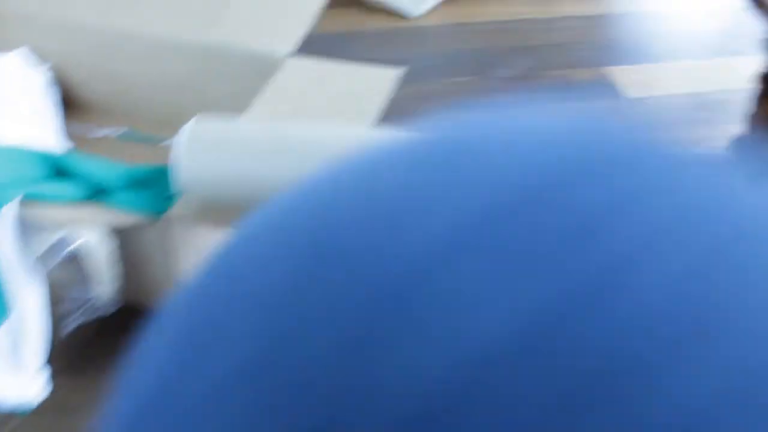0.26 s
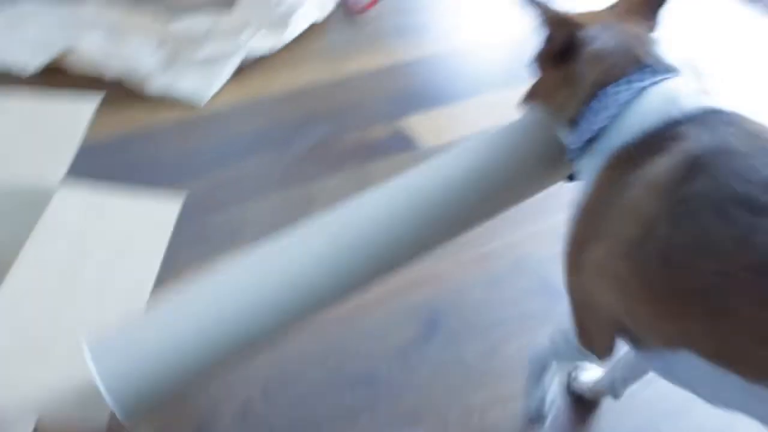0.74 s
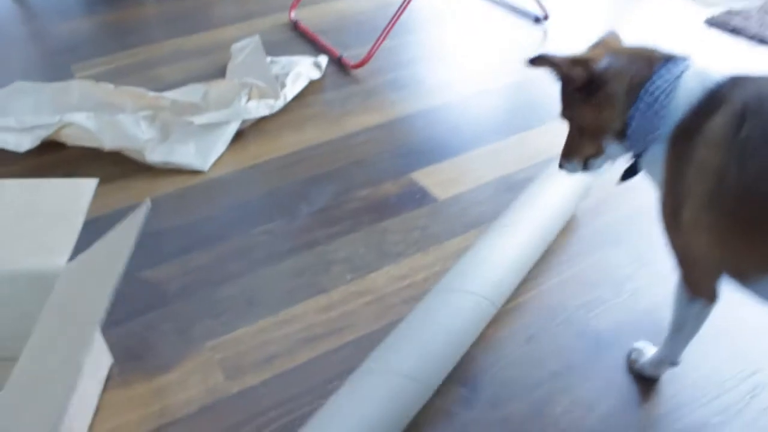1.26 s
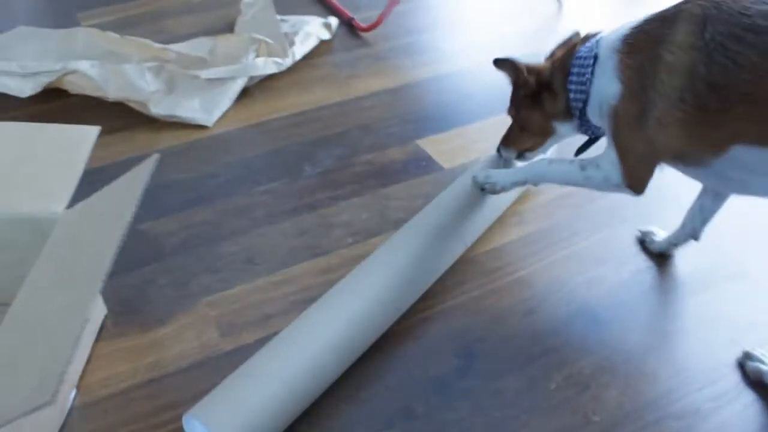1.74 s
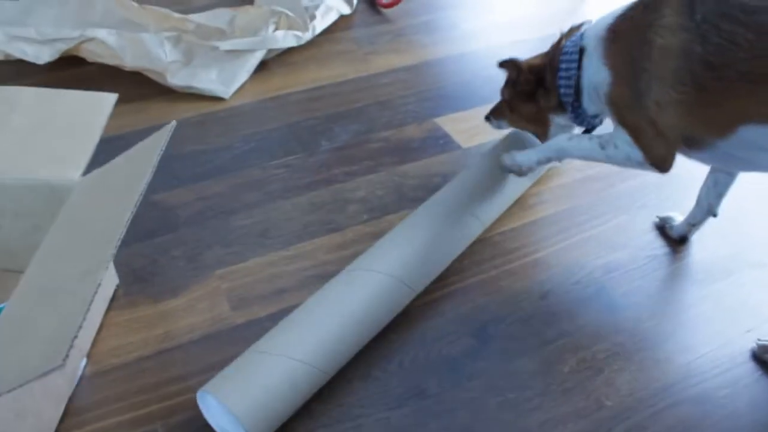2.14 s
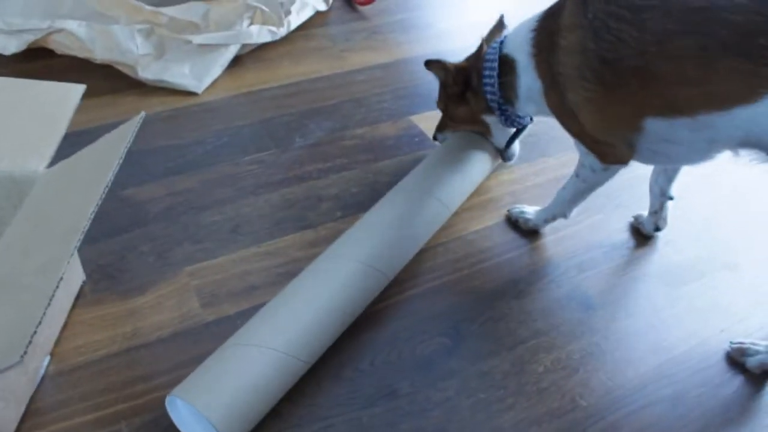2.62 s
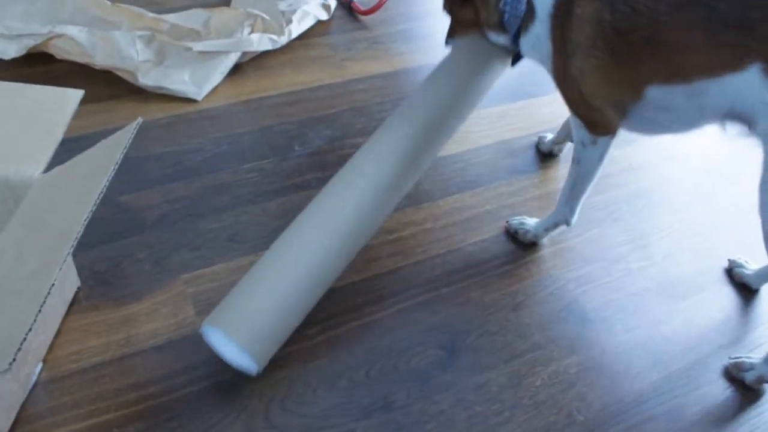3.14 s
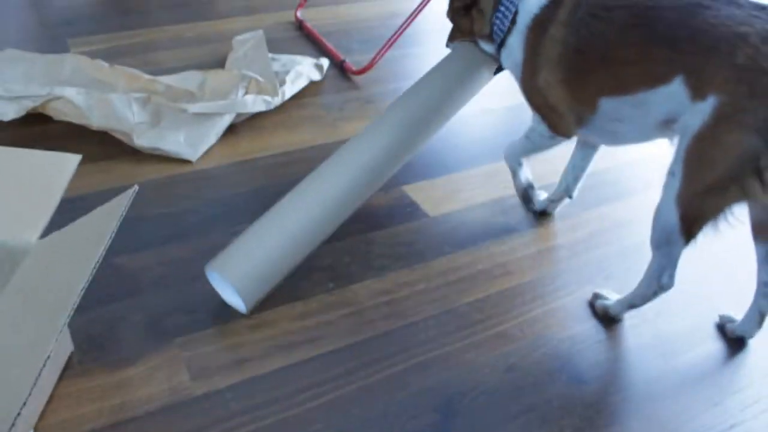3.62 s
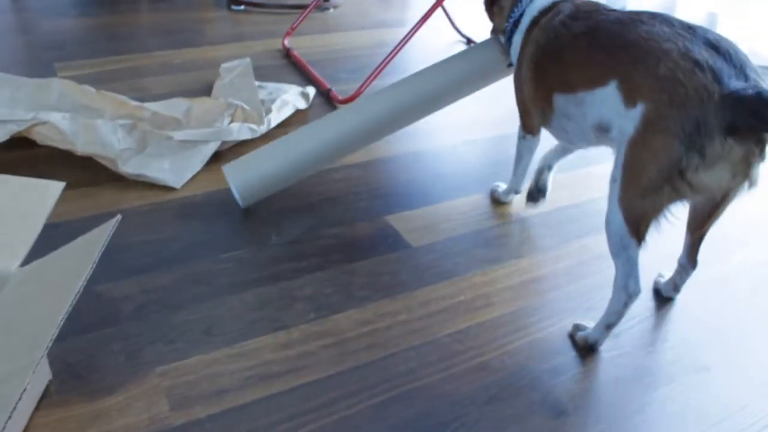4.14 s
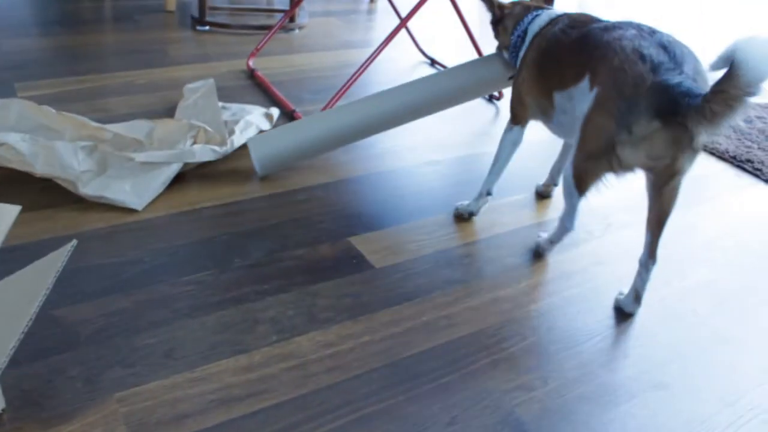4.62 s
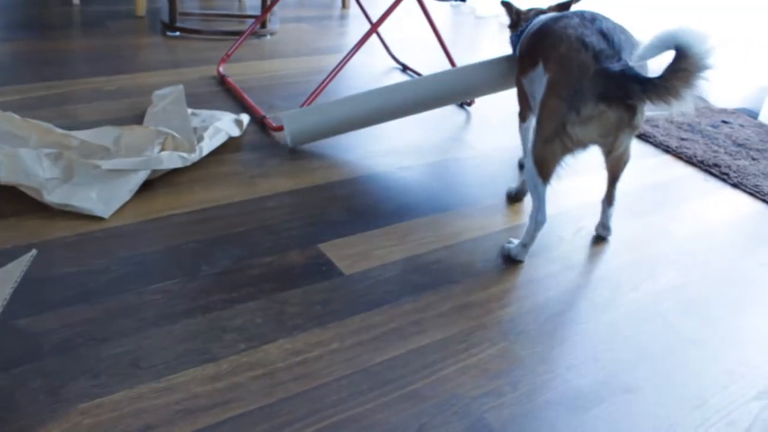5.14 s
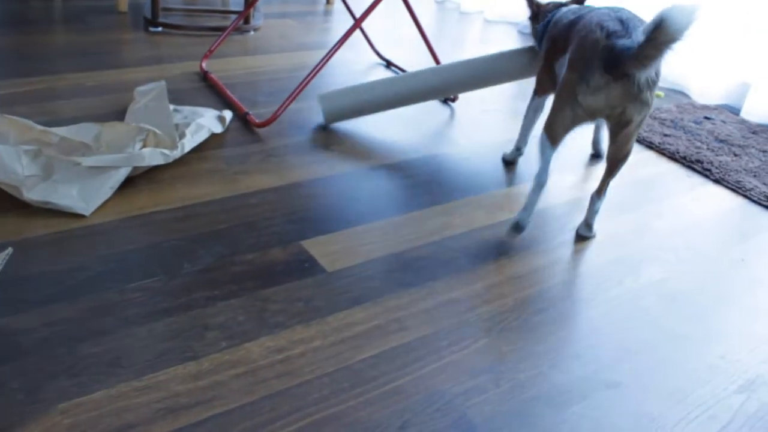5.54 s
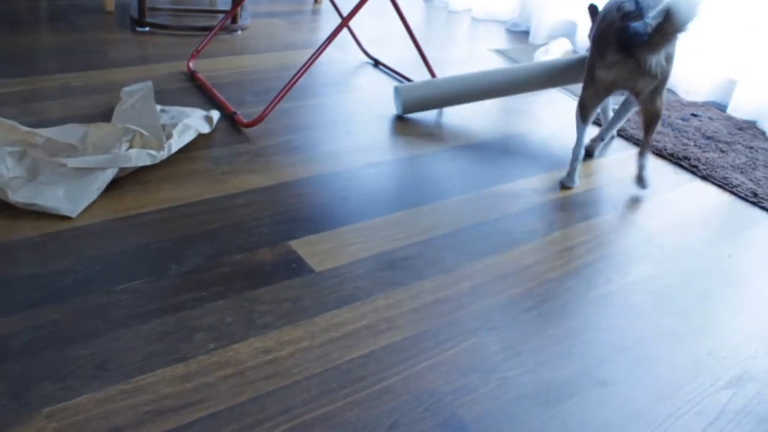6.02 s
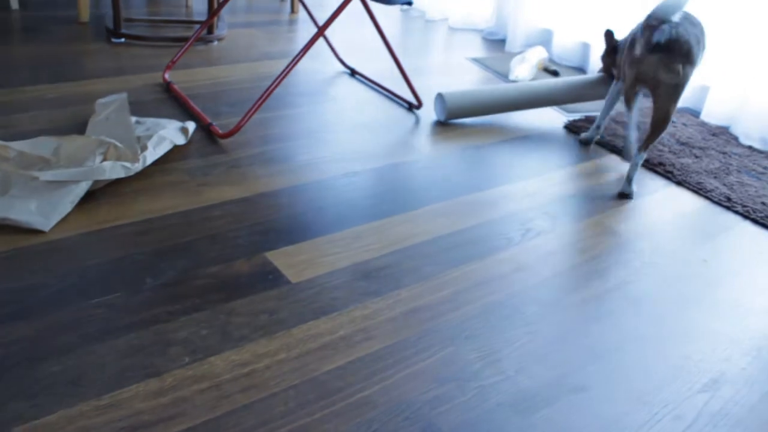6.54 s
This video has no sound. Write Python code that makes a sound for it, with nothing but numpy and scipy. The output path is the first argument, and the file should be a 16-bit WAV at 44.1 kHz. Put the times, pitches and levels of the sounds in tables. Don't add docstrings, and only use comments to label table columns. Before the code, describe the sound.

A dog wrestles a long cardboard tube indoors. Quick scraping and claw clicks lead to sharp, overloaded knocks, followed by a quieter spell of small ticks, scuffs and soft steps. Dry cardboard then slides over floorboards with rumble and dusty hiss, struck by two heavy thuds and a smaller tumbling clatter. Short room echo grows as the action moves away from the slightly dull camera microphone.

```python
import sys
import numpy as np
from scipy import signal
from scipy.fft import rfft, irfft
from scipy.io import wavfile
from scipy.ndimage import uniform_filter1d

SR = 44100
rng = np.random.default_rng(int(sys.argv[2]) if len(sys.argv) > 2 else 0)


def store_wav(level_fs):
    pcm = np.round(np.clip(np.atleast_2d(level_fs), -1, 1) * 32767)
    wavfile.write(sys.argv[1], SR, pcm.T.astype(np.int16))


def linear_from_db(decibels):
    return 10 ** (np.asarray(decibels, float) / 20)


N = 298557


def evened(x):
    return x / np.sqrt(np.mean(x ** 2) + 1e-20)


def read(points, hz):
    point_hz, value = np.transpose(points)
    return np.interp(np.log(hz + 1), np.log(point_hz + 1), value)


def add(mix, start_s, sound):
    part = mix[round(start_s * SR):][:len(sound)]
    part += sound[:len(part)]


def resonate(x, hz, width_hz):
    b, a = signal.iirpeak(min(hz, SR / 2.2), max(hz / width_hz, .3), SR)
    return signal.lfilter(b, a, x)


def resonate_twice(x, hz, width_hz):
    return resonate(resonate(x, hz, width_hz), hz, width_hz)


def highpass(x, order, hz):
    return signal.lfilter(*signal.butter(order, hz, "high", fs=SR), x)


def body(x, modes, wander_db):
    drift = rng.standard_normal((len(modes), len(x) // 400 + 2))
    drift = uniform_filter1d(uniform_filter1d(drift, size=9, axis=1), size=9, axis=1)
    drift = np.repeat(evened(drift), 400, axis=1)[:, :len(x)]
    out = np.zeros(len(x))
    for k, (hz, width_hz, level_db) in enumerate(modes):
        driven = x * linear_from_db(level_db + wander_db * drift[k])
        out += (-1) ** k * resonate_twice(driven, hz, width_hz)
    return evened(out)


def ring(hz, t60_s, size=4000):
    t = np.arange(size) / SR
    return -np.sin(2 * np.pi * hz * t) * linear_from_db(-60 * t / t60_s)


# time_s, level_db
FIZZ = [(0, -7.5), (2.5, -1), (4.5, -11), (5.3, -3.5), (6.5, -33)]


def crack(start_s, t60_s, size=4000):
    grit = rng.standard_normal(size)
    slap = evened(resonate(resonate(grit, 2500, 4200), 2300, 3500))
    fizz = linear_from_db(np.interp(start_s, *np.transpose(FIZZ))) * np.gradient(grit)
    fade = linear_from_db(-60 * np.arange(size) / SR / t60_s)
    return (slap + fizz) / 2.18 * fade


def friction(slips_per_s, spread_db, smooth, flutter_db):
    size_db = spread_db * np.minimum(rng.exponential(1, N), 4)
    slips = (rng.random(N) < slips_per_s / SR) * linear_from_db(size_db)
    rub = evened(slips * rng.standard_normal(N)) + smooth * rng.standard_normal(N)
    flutter = uniform_filter1d(uniform_filter1d(rng.standard_normal(N), size=500), size=500)
    return rub * linear_from_db(flutter_db * evened(flutter))


# freq_hz, density_db_per_hz
QUIET = [(25, -17), (133, -6), (550, -23), (1580, 0), (6650, -20.5), (11000, -18), (12500, -29.5),
         (22000, -120)]


def air():
    spectrum = rfft(rng.standard_normal(N)) * linear_from_db(read(QUIET, np.fft.rfftfreq(N, 1 / SR)))
    return linear_from_db(-70) * evened(irfft(spectrum, N))


# freq_hz, t60_s
ROOM_DECAY = [(100, 0.15), (260, 0.68), (700, 0.33), (1840, 0.32), (4850, 0.26), (7000, 0.39), (12000, 0.1)]
# freq_hz, level_db
ROOM_TONE = [(60, -21), (200, -2.5), (900, 2.5), (3000, 1.5), (5300, 7.5), (6200, -8.5), (12000, 10.5)]


def room(x):
    taps = np.zeros(SR)
    at = np.arange(130, SR - 12, 12)
    taps[at + rng.integers(0, 12, len(at))] = rng.choice([-1., 1.], len(at))
    hz, t, z = signal.stft(taps, SR, nperseg=256)
    decay_db = read(ROOM_TONE, hz)[:, None] - 60 * t / read(ROOM_DECAY, hz)[:, None]
    tail = signal.istft(z * linear_from_db(decay_db), SR, nperseg=256)[1]
    tail *= np.interp(np.arange(len(tail)) / SR, [.003, .004, .025], [0, .45, 1])
    return signal.fftconvolve(x, tail / np.linalg.norm(tail))[:N]


# start_s, peak_db, pitch_hz
PAW_FALLS = [
    (1.654, -51, 394),
    (1.798, -41.5, 340),
    (2.062, -34, 390),
    (2.324, -46, 450),
    (2.626, -61, 326),
    (3.049, -40.5, 194),
    (5.93, -37, 133),
    (6.234, -39, 83.5),
]


def paws():
    out, t = np.zeros(N), np.arange(4000) / SR
    for start_s, peak_db, pitch_hz in PAW_FALLS:
        add(out, start_s, linear_from_db(peak_db) * ring(pitch_hz, 0.052) * (1 - np.exp(-t / 0.0011)))
    return out


# start_s, length_s, level_db, pitch_hz, swell_share of
GROAN_STROKES = [
    (0.021, 0.11, -34.5, 450, 0.68),
    (0.173, 0.22, -33, 438, 0.52),
    (0.323, 0.074, -23.5, 339, 0.66),
    (0.42, 0.023, -47.5, 400, .56),
    (0.507, 0.028, -20, 830, 0.24),
    (1.836, 0.12, -54, 4600, .05),
    (2.073, 0.081, -47, 340, 0.55),
    (3.822, 0.021, -52, 543, .3),
    (6.677, 0.0054, -56, 10600, .2),
    (6.683, .006, -64, 10500, .2),
]
# start_s, length_s, level_db, pitch_hz, swell_share of length
SCUFF_STROKES = [(0.315, 0.065, -26, 2780, 0.96), (0.362, 0.027, -31, 4800, 0.66),
                 (0.571, 0.045, -46, 7000, .5), (1.059, .05, -61, 7960, 0.24),
                 (1.567, 0.044, -54, 5850, .3), (1.696, 0.092, -55, 9000, .3),
                 (1.711, 0.08, -38.5, 2610, 0.73), (2.004, 0.084, -46.5, 1880, 0.51),
                 (2.146, 0.033, -53, 2000, .45), (3.042, 0.041, -44.5, 10100, .1),
                 (3.205, 0.55, -45.5, 2700, 0.33), (4.247, 0.055, -37.5, 11400, 0.082),
                 (4.248, 0.068, -41.5, 2000, .03), (1.504, 0.072, -66, 920, 0.38),
                 (4.789, 0.039, -43, 3630, 0.3), (5.227, 0.012, -16.5, 2970, 0.12),
                 (5.315, 0.012, -38, 6700, .1), (4.046, 0.66, -54, 265, 0.32),
                 (5.544, 0.41, -51.5, 165, 0.97), (5.906, 0.14, -51.5, 1600, 0.49),
                 (6.265, 0.047, -47.5, 1620, .33), (6.473, 0.073, -45.5, 1410, .9),
                 (6.549, 0.12, -43.5, 1970, 0.029)]


def scuffs():
    out = np.zeros(N)
    grit = friction(slips_per_s=2500, spread_db=2.2, smooth=1.6, flutter_db=1.5)
    for strokes, width_share in [(GROAN_STROKES, 0.2), (SCUFF_STROKES, 1.26)]:
        for start_s, length_s, level_db, pitch_hz, swell_share in strokes:
            width_hz = min(width_share * pitch_hz, 5560)
            progress = np.arange(0, 1, 1 / (length_s * SR))
            stroke = np.interp(progress, [0, np.clip(swell_share, .02, .95), 1], [.15, 1, .3])
            rub = grit[round(start_s * SR):][:len(progress)]
            add(out, start_s, linear_from_db(level_db) * stroke * evened(resonate_twice(rub, pitch_hz, width_hz)))
    return out


# start_s, peak_db, pitch_hz, crack_db
CLAW_TICKS = [(0.226, -24, 1695, -12), (0.185, -44, 1090, -3), (0.2451, -18, 2200, 9.5),
              (.272, -17.5, 1800, -16), (.381, -16, 2000, -15), (0.9393, -26.5, 2200, -30),
              (0.985, -28, 1690, -13), (0.887, -24.5, 2500, -17), (1.017, -34.5, 1600, -23.5),
              (1.2833, -38.5, 3060, 0), (1.338, -54, 1600, 7), (1.42, -64.5, 1600, -12.5),
              (1.43, -59, 1812, -7.5), (1.496, -50, 2430, 5), (1.505, -45, 3470, 1),
              (1.6562, -47.5, 910, -4), (1.8352, -32, 1400, 11.5), (1.848, -31, 4720, -4),
              (2.007, -46, 1600, 7.5), (2.337, -37.5, 920, -10), (2.4, -41, 3360, 7.5),
              (2.4066, -33, 3560, -5), (3.07, -40, 810, 11), (3.617, -29, 4800, 0), (3.637, -28, 3400, 1),
              (3.6413, -30, 4630, -6), (3.80, -48, 4840, -7), (4.25, -42.5, 3350, 7)]


def ticks():
    tone, grit = np.zeros((2, N))
    for start_s, peak_db, pitch_hz, crack_db in CLAW_TICKS:
        add(tone, start_s, linear_from_db(peak_db) * ring(pitch_hz, 19 / pitch_hz))
        add(grit, start_s, linear_from_db(peak_db + crack_db) * crack(start_s, 0.018))
    return tone, grit


# freq_hz, width_hz, level_db
WALL_MODES = [(860, 110, 0), (930, 110, -1)]
# freq_hz, width_hz, level_db
BOARD_MODES = [(81, 170, -7), (172, 180, -3.5), (241, 92, -0.5), (327, 110, -6), (450, 150, -8),
               (614.4, 180, -4)]
# start_s, peak_db, contact_hz, hollow_db, crack_db
EDGE_KNOCKS = [(0.4886, 10.5, 745, -1, -18), (0.501, -4.5, 855, -34, -43), (0.7, -5.5, 870, -34, -6.5),
               (.711, 12, 1580, -31, -22), (0.7129, 0.5, 4810, -30, 0.5), (0.7258, -13, 1680, -26, -2),
               (0.8749, -14.5, 1500, -22, -9), (2.069, -28, 998, 7, -8), (3.0464, -23.5, 1080, -20, -0.5),
               (5.228, -12.5, 1240, 11.5, -5), (6.5543, -8.5, 1840, -51, -25.5),
               (6.555, -8.5, 2980, -28, -34)]
# start_s, peak_db, contact_hz, contact_t60_s, crack_db
SIDE_THUDS = [
    (0.8668, -23.5, 858.5, 0.17, -10),
    (4.599, 1.5, 786, 0.0013, -10),
    (5.221, -10, 562, 0.031, -0.5),
    (6.56, -15, 1250, 0.015, -27),
    (6.56, -25, 152, 0.073, -30),
    (6.589, -30, 590, .046, -20),
    (6.607, -31, 884, .069, -24),
]


def knocks():
    contact, tube = np.zeros((2, N))
    blows = []
    for start_s, peak_db, hz, hollow_db, crack_db in EDGE_KNOCKS:
        t60_s = min(.0095, 17 / hz)
        blows.append((start_s, peak_db, hz, t60_s, hollow_db, crack_db))
    for start_s, peak_db, hz, t60_s, crack_db in SIDE_THUDS:
        blows.append((start_s, peak_db, hz, t60_s, 3, crack_db))
    for start_s, peak_db, hz, t60_s, hollow_db, crack_db in sorted(blows):
        hollow = sum(linear_from_db(d) * ring(f * rng.uniform(0.92, 1.074), 5.27 / w) for f, w, d in BOARD_MODES[1:]) / 8
        wall = sum(linear_from_db(d - 20) * ring(f, 3.5 / w) for f, w, d in WALL_MODES)
        add(contact, start_s, linear_from_db(peak_db) * ring(hz, t60_s))
        add(tube, start_s, linear_from_db(peak_db) * (wall + linear_from_db(crack_db) * crack(start_s, 0.039)))
        add(tube, start_s + .0008, -linear_from_db(peak_db + hollow_db) * hollow)
    return contact, highpass(tube, 2, 110)


def rubbing(strokes, rumble_db):
    t, (time_s, pressure_db, speed) = np.arange(N) / SR, np.transpose(strokes)
    db = np.interp(t, time_s, pressure_db, -120, -120)
    fast = np.clip(np.interp(t, time_s, speed), 0, 1)
    wall_db = 1 - 12 * fast
    dust_db = -12 + 9 * fast
    boards_db = rumble_db + 0.53 * (db + 45) + 1.5 * fast
    return linear_from_db([db, db + wall_db, boards_db, db + dust_db])


# start_s, rim_db, wall_db, boards_db
SHUDDER_SWELLS = [(.49, -28.5, -31, -38), (0.699, -25.5, -45, -38.5), (0.866, -38, -35, -38),
                  (1.8, -64, -68.5, -54.5), (2.03, -75, -75, -51), (3.045, -40, -44, -47),
                  (4.6, -30, -57, -36.5), (5.222, -29, -44, -34), (5.93, -51, -46, -46),
                  (6.471, -55, -50, -45.5), (6.58, -46, -58, -34)]


def shudders():
    out, t = np.zeros((4, N)), np.arange(SR) / SR
    rise_s, t60_s = (.03, .01, .017), (.56, .62, .55)
    for start_s, *level_db in SHUDDER_SWELLS:
        for layer in range(3):
            fade = linear_from_db(level_db[layer] - 60 * t / t60_s[layer])
            add(out[layer], start_s, (np.minimum(t / rise_s[layer], 1) * fade) ** 2)
    out[3] = out[0] * linear_from_db(2 * -25.5)
    return out


# time_s, pressure_db, speed 0-1
BOX_PULL = [
    (0.0, -39, 0.44),
    (0.282, -37, 0.94),
    (0.406, -38.5, 0.2),
    (0.486, -49, .2),
]
# time_s, pressure_db, speed 0-1
FLOOR_DRAG = [(1.58, -71.5, .3), (1.82, -53.5, 0.5), (2.09, -73.5, 1), (2.38, -53, 0), (2.68, -50, 0.07),
              (2.92, -45.5, 0), (3.09, -49, 0.18), (3.29, -42.5, 0.46), (3.45, -46.5, 1), (3.88, -49, 0.6),
              (4.11, -50.5, 0.72), (4.29, -45.5, 0.55), (4.87, -51, 0.76), (5.2, -43, 0.94), (5.55, -49, 0),
              (5.9, -53.5, 0.9), (6.3, -49, 0.4), (6.77, -55, 0)]
# freq_hz, width_hz, level_db
RIM_MODES = [(1155, 540, -2.5), (1600, 380, -4.5), (2000, 350, -4), (2200, 120, -1.5), (2500, 390, -0.5),
             (2892, 170, -1), (3096, 96, 1.5), (3325, 200, -4), (3805, 680, -5.5), (4384, 180, -8),
             (4786, 330, -6.5), (5090, 230, -8), (5450, 1400, -12.5)]
# freq_hz, width_hz, level_db
DUST_MODES = [(6180, 800, -9.5), (7100, 5000, -7), (8090, 2200, 3), (9300, 2900, -3), (11120, 1700, 3)]


def drag():
    light = rubbing(BOX_PULL, rumble_db=-43.5) ** 2 + shudders()
    heavy = rubbing(FLOOR_DRAG, rumble_db=-58.5) ** 2
    on_rim, on_wall, _, on_dust = np.sqrt(light + heavy)
    force = friction(slips_per_s=3500, spread_db=2.5, smooth=1.6, flutter_db=0.68)
    fine = friction(slips_per_s=4700, spread_db=4.0, smooth=1.7, flutter_db=0.76)
    rim = body(force, RIM_MODES, wander_db=1.5)
    wall = body(force, WALL_MODES, wander_db=3.5)
    boards = body(force, BOARD_MODES, wander_db=0.5)
    dust = body(fine, DUST_MODES, wander_db=1.6)
    box = highpass(boards, 4, 132)
    floor = np.sqrt(heavy[2]) * boards + np.sqrt(light[2]) * box
    return on_rim * rim + on_wall * wall + floor + on_dust * dust


# time_s, level_db
ECHO_LEVEL = [(0, -9), (2.5, -2.5), (4.499, -2.5), (6.5, 4.5)]


def scene():
    contact, tube = knocks()
    tone, grit = ticks()
    small = grit + paws() + scuffs()
    wet = linear_from_db(np.interp(np.arange(N) / SR, *np.transpose(ECHO_LEVEL)))
    spread = .3 * np.tanh(contact / .3)
    echo = room(wet * (linear_from_db(-2.5) * spread + linear_from_db(-0.5) * tone))
    echo += room(wet * (tube + linear_from_db(-3.5) * small))
    return (contact + tone + tube + small + echo + drag() + air())[None]


def roll_off(x):
    return signal.sosfilt(signal.butter(12, 13270, fs=SR, output="sos"), x)


def record(dry):
    thin = highpass(dry, 2, 60)
    limit = .76
    held = thin / (1 + abs(thin / limit) ** 6) ** (1 / 6)
    edge = signal.firwin(601, 12050, window=("kaiser", 8), fs=SR)
    mix = signal.oaconvolve(held, edge[None], "same")
    return roll_off(mix)


dry = scene()
out = record(dry)
store_wav(out)
```